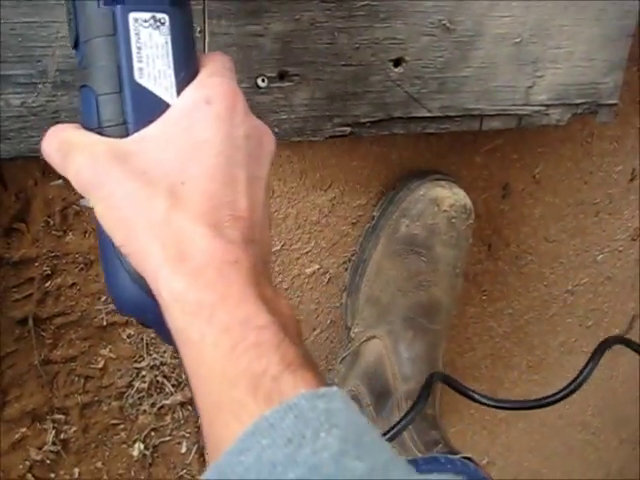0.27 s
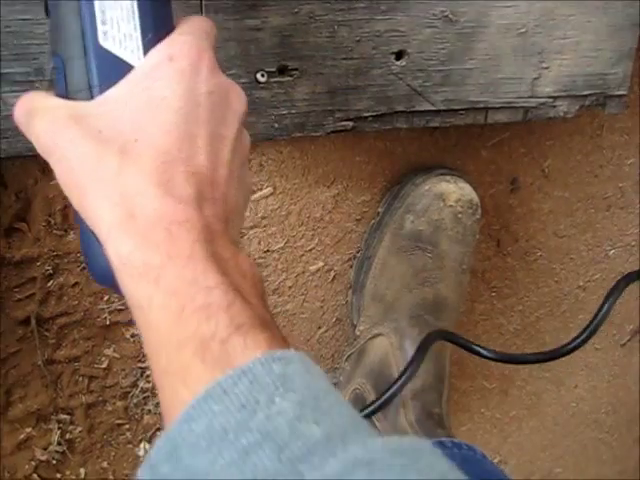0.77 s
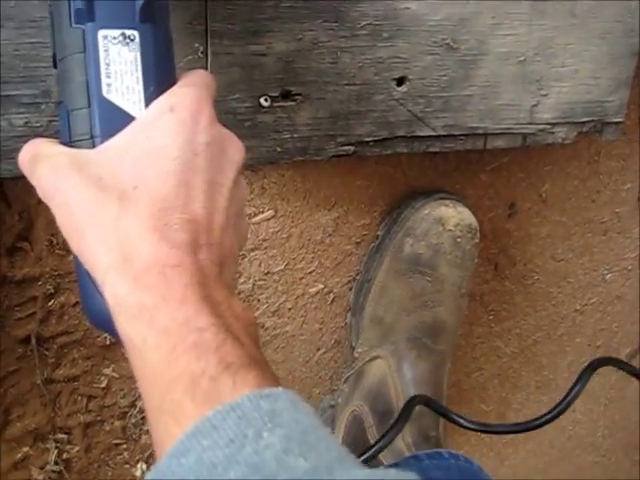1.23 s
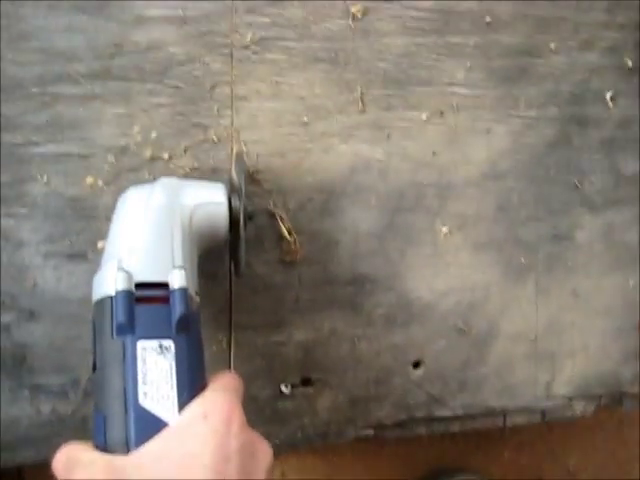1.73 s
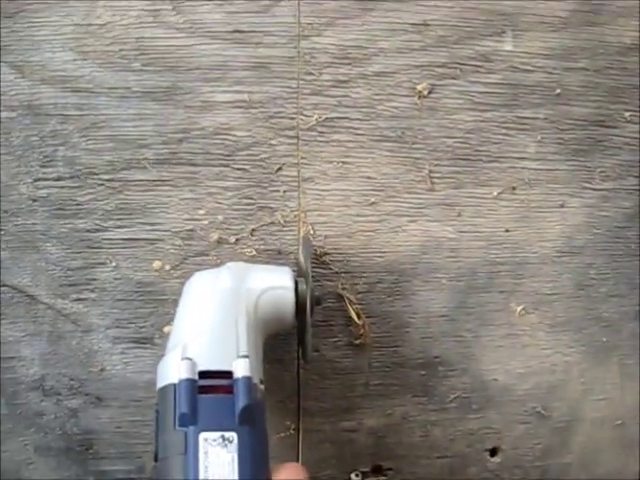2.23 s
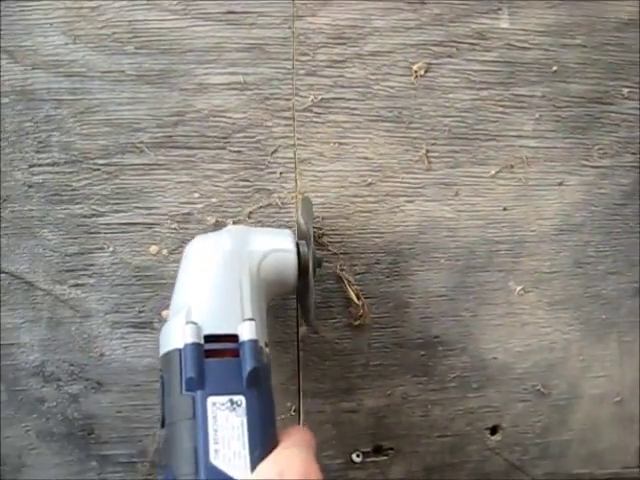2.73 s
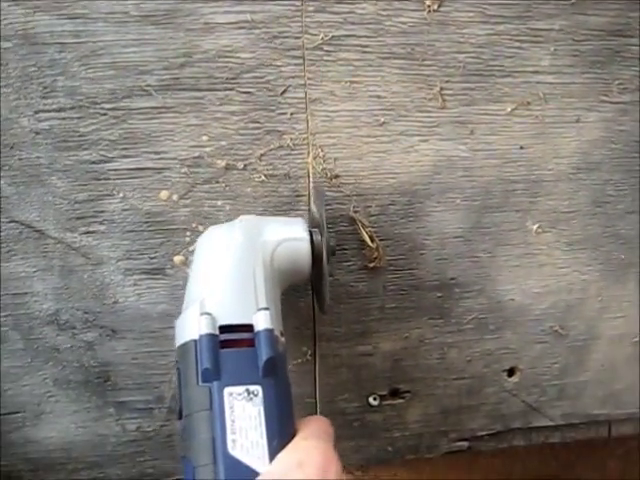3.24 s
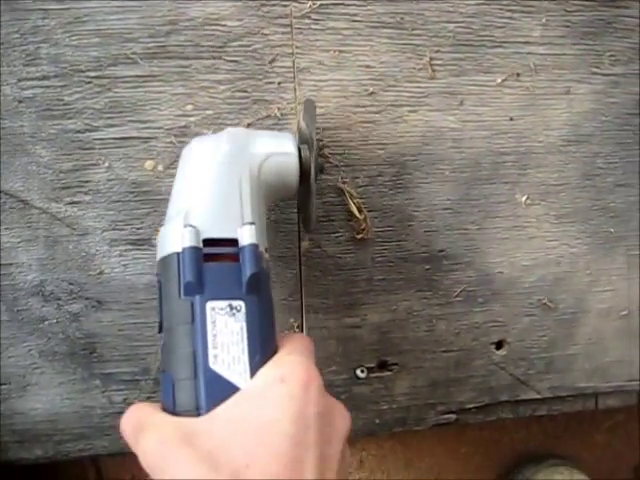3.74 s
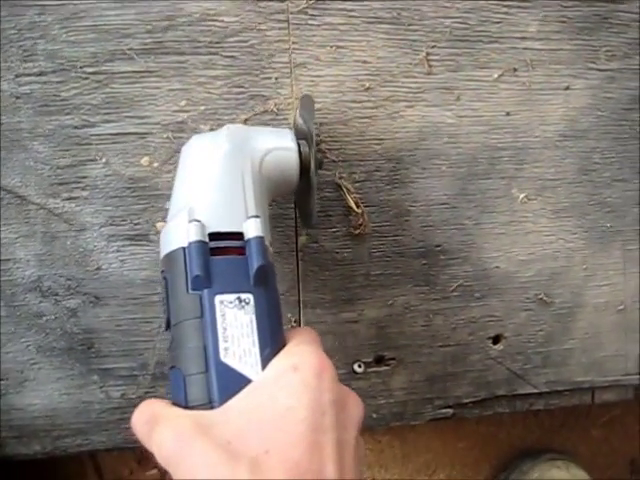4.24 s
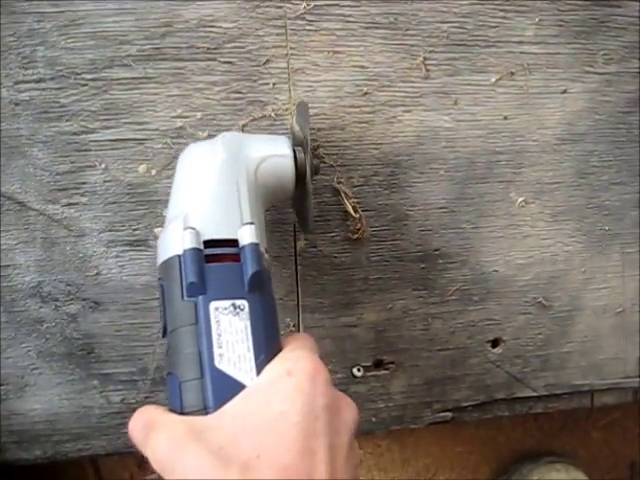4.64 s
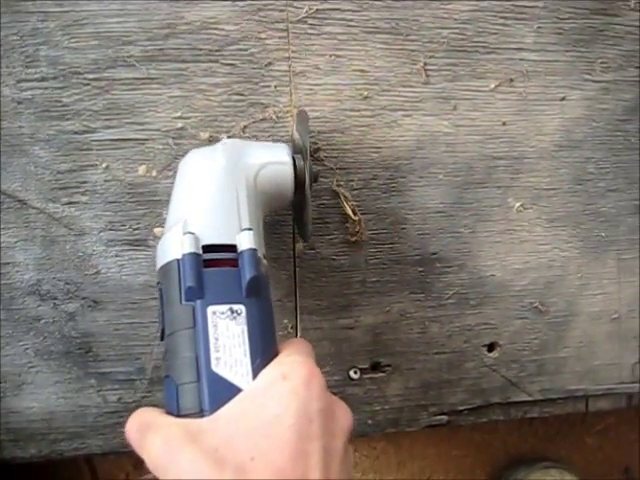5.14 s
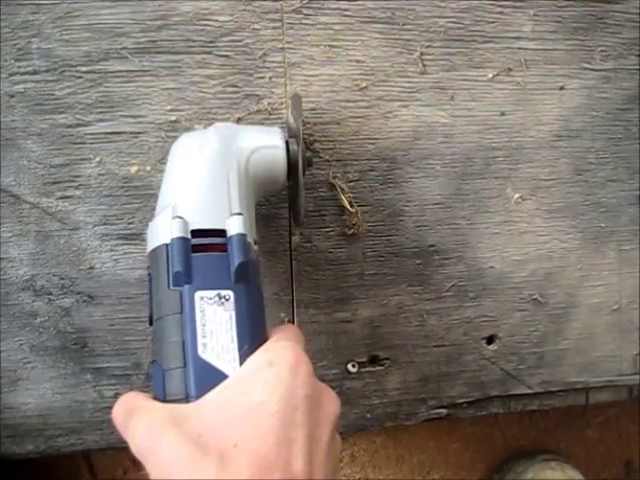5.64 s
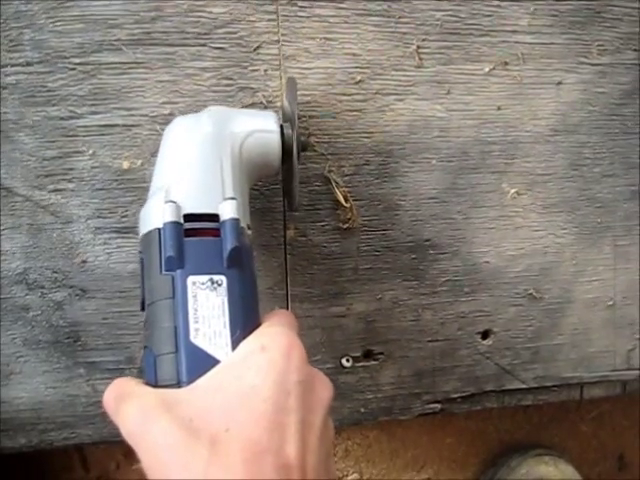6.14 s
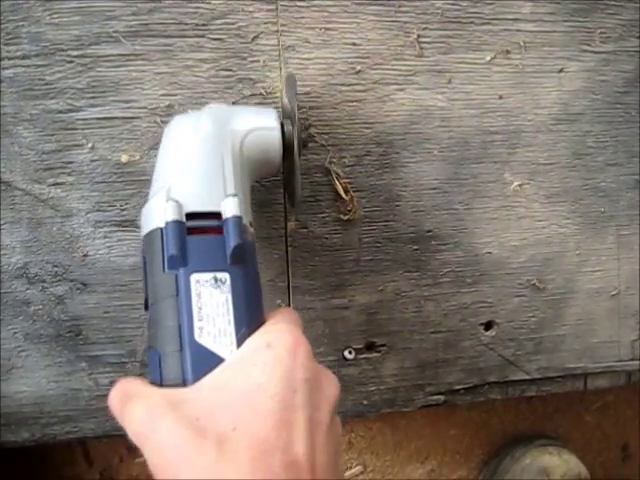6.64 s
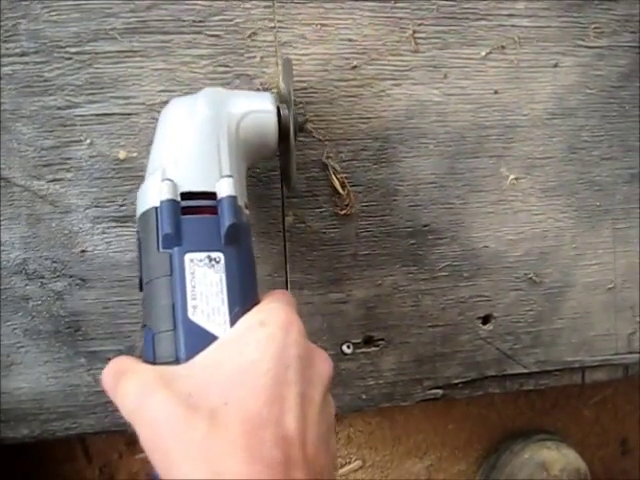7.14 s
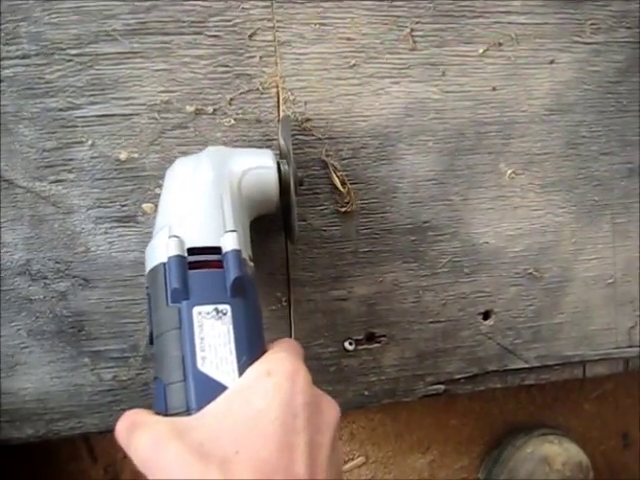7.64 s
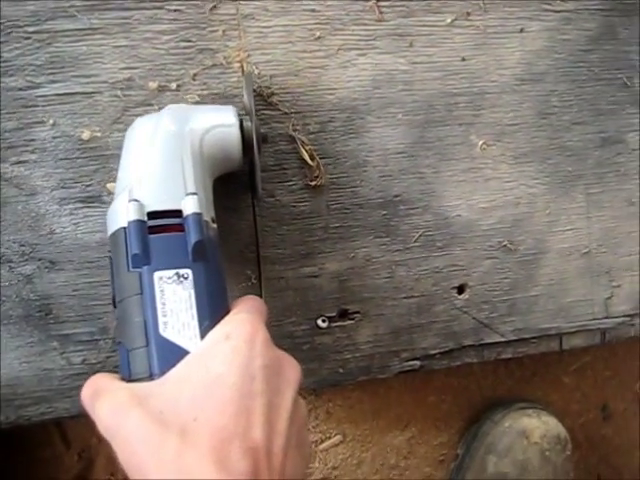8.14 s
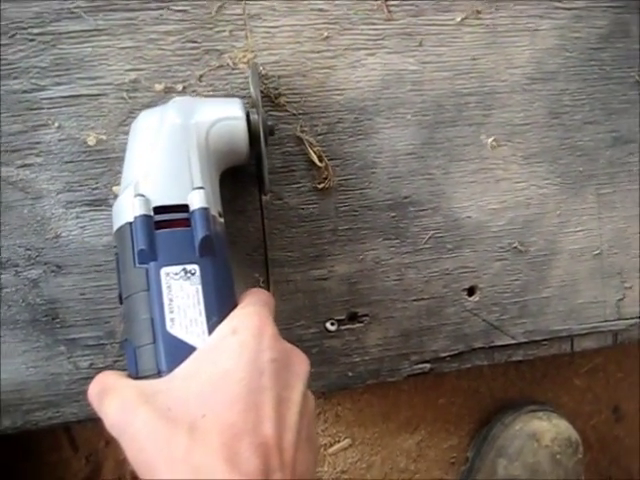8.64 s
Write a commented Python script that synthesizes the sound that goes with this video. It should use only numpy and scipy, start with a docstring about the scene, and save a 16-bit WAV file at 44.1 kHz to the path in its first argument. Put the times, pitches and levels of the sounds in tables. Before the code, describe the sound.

A handheld oscillating multi-tool whines freely, then bites into a weathered board, buzzing harshly, rattling and rasping as its pitch sags lower.

```python
"""An oscillating multi-tool runs free at first: its drive whines and hisses, each tone tied to the stroke rate.
Soon its blade enters a wooden board; the motor sags, the board hums, the blade rattles and the teeth rasp.
Bound stretches bring a harder knock once a stroke, skids bring contacts out of step, and some modes squeal.
About 3 s in, the blade jolts once; long even cuts follow, from 4 s and from 5.3 s, then more skids.
Near the end the motor bogs down to its lowest pitch while the blade hops on the wood."""
import sys
import numpy as np
from scipy import signal
from scipy.fft import rfft, irfft
from scipy.io import wavfile
from scipy.ndimage import uniform_filter1d

SR = 44100
rng = np.random.default_rng(int(sys.argv[2]) if len(sys.argv) > 2 else 0)


def int16_out(signal):
    """Quantize to a 16-bit WAV file."""
    q = np.round(np.clip(np.atleast_2d(signal).T, -1, 1) * 32767)
    wavfile.write(sys.argv[1], SR, q.astype(np.int16))


N = 392490
T = np.arange(N) / SR  # time of each sample, s

# speed of the motor, sagging as the hand pushes: t/s, stroke rate f/Hz
SPEED = [(0.1, 319), (0.64, 316.6), (0.88, 304.7), (1.12, 305.2), (1.22, 295), (1.63, 276.7), (1.73, 277.9),
         (2.12, 268.8), (2.29, 273.7), (2.39, 269.2), (2.66, 249.7), (3.07, 273.8), (3.22, 266.5),
         (3.37, 269.5), (3.49, 264.2), (3.66, 271.3), (3.81, 264.8), (4.29, 260), (4.47, 244),
         (4.81, 263.5), (5.27, 268.4), (5.66, 256.7), (5.86, 257.3), (6.39, 251.9), (6.59, 257.2),
         (6.74, 267.7), (7.0, 262.2), (7.25, 267), (7.42, 261.6), (7.61, 270.5), (7.74, 270.1),
         (8.01, 256.1), (8.18, 253.2), (8.39, 239.7), (8.76, 226.2), (8.86, 224.2)]
# how hard the board shakes: multiple of the stroke rate, level/dB in the wood without sag, slope/dB per Hz of sag
BOARD_HUM = [(1, -35.5, 0.2017), (2, -49.5, 0.2292)]
# how the housing answers multiples 3 to 5 of the stroke rate: f/Hz, level/dB
HOUSING = [(680, -40.5), (770, -41.5), (830, -32), (875, -29.5), (920, -44), (970, -31), (1090, -35.5),
           (1205, -27.5), (1270, -37), (1325, -31.5), (1500, -38.5)]
# how far the housing follows the hand: multiple of the stroke rate, dB per dB of the first push column
HOUSING_PUSH = [(3, 0.66), (4, 0.76), (5, 0.23)]
# the hand presses down or eases off: start t/s, end t/s, gain of the stroke rate/dB, gain of its double/dB
PUSHES = [(1.2, 1.5, 1.5, 7), (1.48, 1.7, -4.5, -7), (1.8, 2.2, -4.5, 3.5), (2.2, 2.9, 1.5, 6),
          (2.98, 3.79, -7.5, -2.5), (4.38, 4.66, -4, 4), (4.87, 5.45, -2.5, 5.5), (5.45, 6.42, -1.5, 3),
          (6.42, 6.76, 3, 6), (6.72, 7.0, -4.5, 1.5), (6.98, 7.3, 0.5, 3), (7.28, 7.95, -7, -10),
          (8.4, 9.2, 1, 4)]
# the housing drones louder or quieter as the grip shifts: start t/s, end t/s, gain/dB
GRIPS = [(1.49, 1.62, 4.5), (2.5, 2.7, 1.5), (3.13, 3.24, 8.5), (3.26, 3.35, -21), (3.35, 3.68, 7),
         (4.95, 5.52, 3), (5.7, 6.15, -3), (7.32, 7.52, 4.5), (7.59, 7.68, 8.5)]
# whine of the unloaded drive: multiple of the stroke rate, level/dB
IDLE_WHINE = [(7, -28), (8, -39.5), (11, -32.5), (13, -29.5), (15, -25), (17, -29.5), (18, -27.5),
              (22, -37), (29, -39), (31, -36)]
# the motor whistle is loudest where it meets a resonance of the housing: f/Hz, level/dB
WHISTLE = [(9100, -49), (9650, -41), (10300, -41), (11000, -39), (11450, -50)]
# tones beside the low multiples, from mains ripple in the motor's torque: f/Hz, level/dB
RIPPLE = [(155, -72), (205, -54), (400, -55.5), (620, -62), (900, -59)]
# colour of the board under the blade: f/Hz, level/dB
WOOD = [(1150, -66), (1380, 1), (1530, 7.5), (1880, -0.5), (2150, 2), (2700, 4), (3300, 0.5), (3750, 0.5),
        (4100, -12), (5500, -53)]
# colour of the steel blade and its clamp: f/Hz, level/dB
STEEL = [(2600, -35.5), (3700, -8), (4050, 10), (4900, 10), (5700, 0), (6150, -3.5), (7400, -14.5),
         (8800, -12), (10000, -5), (12000, -30), (15500, -49)]
# colour of the hard, clean knock of a blade that sits square: f/Hz, level/dB
SQUARE_KNOCK = [(3300, -19.5), (4100, 2), (4900, 2), (5650, -3.5), (6100, -30.5), (6750, -11.5),
                (7500, -28), (8700, -21), (9600, -10.5), (10400, -12.5), (12000, -40)]
# colour of teeth tearing fibres: f/Hz, level/dB
FIBRES = [(100, -41), (400, -14.5), (620, -21.5), (1000, -9), (1600, -6), (2700, -7), (3700, -6.5),
          (4600, 2.5), (5600, -1), (6900, -9), (9800, -11.5), (11800, -20), (13500, -22.5), (15600, -35)]
# how hard the teeth tear the wood: t/s, level/dB before the mix offset in scene()
RASP = [(0, -24.5), (.7, -23), (1.0, -19.5), (2.2, -20), (2.8, -21), (3.15, -20), (3.7, -19.5),
        (4.4, -22.5), (5.05, -20), (5.7, -21.5), (6.35, -24), (6.8, -20.5), (7.6, -21), (8.9, -25)]
# the blade binds and knocks: start t/s, end t/s, gain of the steel and its fizz/dB
BINDS = [(0.745, 0.894, 6.5), (0.925, 1.217, 4), (1.439, 1.498, 5.5), (1.545, 1.597, 6), (1.784, 1.92, 4),
         (2.007, 2.096, 4.5), (2.267, 2.322, 4), (2.389, 2.521, -0.5), (3.059, 3.114, 3),
         (3.135, 3.25, 2.5), (3.344, 3.451, 3.5), (3.539, 3.601, 4.5), (3.715, 3.749, 5),
         (4.001, 4.404, 1.5), (4.4, 4.758, -0.3), (4.842, 4.968, 5), (5.042, 5.08, 7), (5.142, 5.265, 3),
         (5.286, 5.616, 0), (5.618, 6.001, -1.7), (6.776, 6.94, 3), (7.225, 7.46, 4), (7.61, 7.801, 5),
         (7.77, 8.496, 0.7)]
# the blade sits square and cuts evenly: start t/s, end t/s (a row that ends before it starts is silent)
EVEN_CUTS = [(1.79, 1.56), (2.42, 2.54), (4.0, 4.48), (5.27, 6.45), (6.8, 6.97)]
# the blade skids out of step: start t/s, end t/s, share of stray strokes 0-1
SKIDS = [(1.26, 1.42, .4), (2.747, 2.9, .25), (2.95, 3.142, .4), (3.165, 3.292, .5), (3.643, 3.74, .5),
         (6.68, 6.788, .7), (7.012, 7.126, .85), (7.516, 7.621, .7)]
# the blade leans on the side of the slot and the board's buzz changes: start t/s, end t/s, gain/dB
LEANS = [(1.4, 1.5, 3.5), (1.71, 1.8, 2), (1.99, 2.07, 3.5), (2.18, 2.33, 2.5), (2.45, 2.59, 2.5),
         (2.77, 2.86, 2.5), (3.68, 3.8, 3), (4.78, 4.9, -1.5), (7.52, 7.65, 3.5), (7.91, 8.37, 3)]
# the blade loses its grip for a moment and the cut goes quieter: start t/s, end t/s, gain/dB
SLIPS = [(1.91, 1.96, -1.5), (2.66, 2.78, -2.5), (3.26, 3.33, -1), (4.96, 5.01, -4), (6.96, 7.02, -2.5),
         (8.49, 8.71, -0.5)]
# the blade or housing rings at one of its own pitches: start t/s, end t/s, f/Hz, level/dB
SQUEALS = [(.9, 1.46, 2110, -29), (2.97, 3.1, 2170, -28), (3.15, 3.27, 5450, -24), (4.78, 5.19, 2680, -32),
           (4.85, 6.02, 5650, -31), (7.45, 7.66, 2150, -30), (7.93, 8.4, 2950, -29),
           (7.86, 8.92, 6450, -35)]
# the tool hops on the wood: start t/s, end t/s, strokes per hop, slap level/dB, thud level/dB
HOPS = [(0.908, 1.039, 2, -47, -41), (1.097, 1.528, 3, -32, -55), (8.201, 8.946, 2, -35, -66)]
# the top treble drops as the cut begins and lifts slightly near the end: start t/s, end t/s, gain/dB
SHADES = [(0.54, 1.58, -5.5), (7.8, 9.2, 0.5)]

BITE_S = (0.57, 0.82)  # the blade enters the wood
# strokes a second without load; the sag beyond which the board shakes no harder; the usual sag
FREE_HZ, FULL_SAG_HZ, USUAL_SAG_HZ = 319, 64.4, 52.4
HUM_FREE_DB = -21  # change of the board hum while the blade is out of the wood
HOUSING_WAVER_DB = 2.0
RIPPLE_HZ = 100
RATTLE_DB, RATTLE_FREE_DB = -23, -28  # in the wood and out of it
RATTLE_DB_PER_HZ = 0.03  # more sag, more rattle
BUZZ_DB = -26
BIND_FADE_S, LEAN_FADE_S, PUSH_FADE_S = 0.022, 0.011, 0.051
SLIP_FADE_S, SKID_FADE_S, GRIP_FADE_S = 0.0058, 0.011, 0.014
SKID_STEEL_DB, SKID_RASP_DB = 1.8, 0.7
BOUND_SKID_RASP_DB = 3.6  # extra rasp where binding and skidding overlap
EVEN_SHARE, EVEN_STEEL_DB, EVEN_RASP_DB = .8, 2, -2.6
ZING_DB, ZING_HZ, ZING_WIDTH_HZ = -18.5, 9420, 1800  # level is added to the RASP table's level
JOLT_S, JOLT_DB = 3.06, 1
FLARE_DB, FLARE_HZ = 7, (4300, 5850)
SHIFT_DB, SHIFT_HZ, SHIFT_S = 3, 480, .085  # typical depth, then patch size in pitch and time
FLUTTER_DB, FLUTTER_TURNS = 3, .025
SQUEAL_FADE_S, SQUEAL_WAVER_DB = .025, 2.5
SHADE_HZ, EDGE_HZ = 7700, 15700


def amp(db):
    """Turns decibels into gain."""
    return 10 ** (np.asarray(db) / 20)


def curves(rows):
    """Joins each column of a table by straight lines in time."""
    s, *columns = np.transpose(rows)
    return [np.interp(T, s, c) for c in columns]


def spell(start, end, fade_s=0.0044):
    """One between two times, with short fades."""
    return np.clip(np.minimum(T - start, end - T) / fade_s, 0, 1)


def spells(rows, fade_s):
    """One curve per value column: on during each row's time, zero between; overlapping rows add."""
    out = np.zeros((len(rows[0]) - 2, N))
    for start, end, *values in rows:
        on = slice(*np.searchsorted(T, [start, end]))
        fade = np.minimum(np.minimum(T[on] - start, end - T[on]) / fade_s, 1)
        out[:, on] += np.outer(values, fade)
    return out


def sag_of(speed):
    """How far the motor has slowed, in Hz, up to the limit."""
    return np.minimum(FREE_HZ - speed, FULL_SAG_HZ)


def steady(x, size=1400):
    """Scales x to a running rms of one."""
    power = uniform_filter1d(uniform_filter1d(x ** 2, size), size)
    return x / np.sqrt(power + 1e-12)


def blend(a, b, share):
    """Crossfades from a to b at equal power."""
    return np.sqrt(1 - share) * a + np.sqrt(share) * b


def drift(hz):
    """Slow chance of unit size, with changes up to about hz."""
    count = N // 64
    f = np.fft.rfftfreq(count, 64 / SR)
    x = irfft(rfft(rng.standard_normal(count)) * np.exp(-(f / hz) ** 2), count)
    return np.interp(T, np.arange(count) * 64 / SR, x / x.std())


def ring(x, colour, size=4096):
    """Passes x through a body with the given spectrum that answers only after it is struck."""
    hz, db = np.transpose(colour)
    f = abs(np.fft.fftfreq(size, 1 / SR)) + 1
    log_gain = np.log(amp(np.interp(np.log(f), np.log(hz), db)))
    # the phase that belongs to this spectrum puts the energy as early as possible
    response = np.fft.ifft(np.exp(np.conj(signal.hilbert(log_gain)))).real
    return signal.oaconvolve(x, response[:size // 2])[:N]


def fuzzy_tone(hz, width_hz):
    """Noise passed twice through one narrow resonance, rms one."""
    r = np.exp(-np.pi * width_hz / SR)
    poles = [1, -2 * r * np.cos(2 * np.pi * hz / SR), r * r]
    x = signal.lfilter([1, 0, -1], poles, rng.standard_normal(N))
    x = signal.lfilter([1, 0, -1], poles, x)
    return x / x.std()


def shifting(x, size=512):
    """The resonances of blade and board flare and sink in patches as the point of contact moves."""
    hz, s, z = signal.stft(x, SR, nperseg=size)
    field = rng.standard_normal(z.T.shape).T
    for _ in range(2):
        field = uniform_filter1d(field, round(SHIFT_HZ / hz[1]), axis=0)
        field = uniform_filter1d(field, round(SHIFT_S / s[1]), axis=1)
    gain = amp(2 * SHIFT_DB * np.tanh(.5 * field / field.std()))
    return steady(signal.istft(z * gain, SR, nperseg=size)[1][:N])


def contact(turns, place, force, jitter, uneven, size=8):
    """One click a stroke at a place in the cycle; timing (in cycles) and strength vary by stroke."""
    strokes = np.arange(-1, int(turns[-1]) + 1)
    chance = rng.standard_normal((N // 100, 2))[:len(strokes)]
    cycle = strokes + np.interp(strokes, turns, place) + jitter * chance[:, 0]
    at = np.interp(cycle, turns, np.arange(N))
    strength = np.interp(strokes, turns, force) * np.exp(uneven * chance[:, 1])
    strength = strength * (at > 0) * (at < N - 1)
    # a short smooth pulse lets a click fall between two samples
    taps = at.astype(int)[:, None] + np.arange(1 - size, size + 1)
    offset = taps - at[:, None]
    clicks = strength[:, None] * np.sinc(offset) * np.cos(np.pi * offset / (2 * size)) ** 2
    return np.bincount(np.clip(taps, 0, N - 1).ravel(), clicks.ravel(), N)


def chatter(turns, wander, wander_hz, swing_db, swing_hz, jitter, uneven, count=6):
    """Several light contacts in every stroke; each slides through the cycle and comes and goes."""
    out = np.zeros(N)
    for k in range(count):
        place = (k + rng.random()) / count + wander * drift(wander_hz)
        force = amp(swing_db * drift(swing_hz))
        out += (-1) ** k * contact(turns, place, force, jitter, uneven)
    return out


def skitter(turns, count=3):
    """A few contacts a stroke, scattered widely in the cycle."""
    return sum((-1) ** k * contact(turns, np.full(N, k / count), np.ones(N), jitter=.09, uneven=.3)
               for k in range(count))


def rumble(speed, load):
    """A faint low shudder that grows with the push on the board."""
    colour = [(25, -0.5), (90, -2.0), (300, 6.5), (900, -39)]
    low = steady(ring(rng.standard_normal(N), colour), size=8000)
    push_db = spells(PUSHES, PUSH_FADE_S)[0]
    return amp(-57.5 - 10 * (1 - load) + 0.056 * sag_of(speed) + push_db) * low


def growl(turns, speed):
    """Mains ripple puts weak tones above and below the first three multiples of the stroke rate."""
    out = np.zeros(N)
    for k in range(1, 4):
        for hz in (-RIPPLE_HZ, RIPPLE_HZ):
            level_db = np.interp(k * speed + hz, *np.transpose(RIPPLE)) + 2.3 * drift(12)
            out += amp(level_db) * np.cos(2 * np.pi * (k * turns + hz * T + rng.random()))
    return np.sqrt(2) * out


def motor(turns, speed):
    """The commutator whistles 36 times a turn; a bearing hisses at the start and near the end."""
    bars = 36
    whistle_db = np.interp(bars * speed, *np.transpose(WHISTLE)) + 1.2 * drift(25)
    whistle = np.sqrt(2) * amp(whistle_db) * np.sin(2 * np.pi * bars * turns + 0.5 * drift(40))
    hiss_on = spell(-1, 1.12) + 0.7 * spell(7.95, 8.62)
    hiss = amp(-50 + 3 * drift(25)) * hiss_on * fuzzy_tone(13500, 500)
    return whistle + hiss


def free_drive(turns):
    """Gears and bearings of the unloaded tool whine at multiples of the stroke rate, with a thin hiss."""
    whine = np.zeros(N)
    for k, db in IDLE_WHINE:
        phase = 2 * np.pi * (k * turns + rng.random()) + 0.011 * k * drift(83)
        whine += amp(db + 1.5 * drift(19)) * np.cos(phase)
    return np.sqrt(2) * whine + amp(-28.5) * fuzzy_tone(6160, 130)


def hum(turns, speed, load, skid, even):
    """The swinging blade shakes the board at multiples 1 and 2, and the housing at 3 to 5."""
    pushes = spells(PUSHES, PUSH_FADE_S)
    grip_db = spells(GRIPS, GRIP_FADE_S)[0]
    unsteady = 1 - .5 * even
    levels = []
    for (k, db, slope), push_db in zip(BOARD_HUM, pushes):
        load_db = slope * sag_of(speed) + HUM_FREE_DB * (1 - load)
        levels.append((k, db + load_db + push_db + k * 1.16 * unsteady * drift(8.8)))
    for k, share in HOUSING_PUSH:
        db = np.interp(k * speed, *np.transpose(HOUSING)) + share * pushes[0]
        # the grip acts only above 900 Hz
        db = db + (k * speed > 900) * grip_db + load * unsteady * HOUSING_WAVER_DB * drift(12.4)
        levels.append((k, db))
    out = np.zeros(N)
    for k, db in levels:
        flutter = np.sqrt(skid) * (1 < round(k) < 4)  # stray strokes make multiples 2 and 3 flutter
        gain = amp(db + (.5 + FLUTTER_DB * flutter) * drift(26.4))
        cycles = round(k) * turns + rng.random() + FLUTTER_TURNS * flutter * drift(50)
        out += gain * np.cos(2 * np.pi * cycles)
    return np.sqrt(2) * out


def jolt():
    """The blade jumps once in the slot and knocks dully on the board."""
    return amp(JOLT_DB) * ring(1.0 * (np.arange(N) == round(JOLT_S * SR)), WOOD)


def hops(turns):
    """A slap and a thud tied to hops slower than the stroke put tones between its multiples."""
    out = np.zeros(N)
    for start, end, strokes, slap_db, thud_db in HOPS:
        hop = turns / round(strokes)
        blows = contact(hop, 0.279 + 0.0018 * drift(6), np.ones(N), jitter=0.0011, uneven=0.13)
        slaps = ring(blows, WOOD)
        thud = np.sqrt(2) * np.sin(2 * np.pi * (turns - hop) + .5 * drift(11))
        both = amp(slap_db) * slaps / slaps.std() + amp(thud_db) * thud
        out += spell(start, end, fade_s=0.12) * both
    return out


def squeals(turns, width_hz=260):
    """The strokes keep one mode ringing for a while, unsteadily."""
    kicks = contact(turns, np.zeros(N), np.ones(N), jitter=0.002, uneven=0.095)
    out = np.zeros(N)
    for start, end, hz, db in SQUEALS:
        gate = spell(start, end, SQUEAL_FADE_S) * amp(SQUEAL_WAVER_DB * drift(16))
        mode = signal.iirpeak(hz, hz / width_hz, SR)
        on = gate > 0
        ringing = signal.lfilter(*mode, signal.lfilter(*mode, kicks[on]))
        out[on] += amp(db) * gate[on] * steady(ringing)
    return out


def buzz(turns, skid):
    """The sides of the blade slap the slot and the board answers; in a skid the slaps lose their rhythm."""
    slaps = chatter(turns, wander=0.039, wander_hz=2.0, swing_db=5, swing_hz=17.8,
                    jitter=0.0009, uneven=0.028)
    return blend(steady(ring(slaps, WOOD)), steady(ring(skitter(turns), WOOD)), skid)


def rasp(turns, bound):
    """Teeth tear fibres on the way out and back: hiss and tiny snaps, a touch stronger near the knock."""
    sweep = 1 + .35 * np.cos(4 * np.pi * (turns - .27))
    near_knock = 1 + 0.042 * bound * np.exp(-((turns % 1 - .28) / 0.0086) ** 2)
    snap_on = rng.random(N) < 700 / SR  # about 700 snaps a second
    snaps = snap_on * rng.standard_normal(N) * amp(2.0 * np.minimum(rng.exponential(1, N), 4))
    tearing = (rng.standard_normal(N) + 1.77 * snaps) * sweep * near_knock
    return shifting(ring(tearing, FIBRES)) * amp(1.2 * drift(30))


def zing(turns):
    """A bright fizz of the teeth that jumps up at the knock's place in each stroke, then fades."""
    swell = 0.12 + np.exp(-((turns - .246) % 1) / 0.5)
    return steady(fuzzy_tone(ZING_HZ, ZING_WIDTH_HZ) * swell)


def shade(x):
    """Turns the top of the treble down or up for a while."""
    top = signal.sosfiltfilt(signal.butter(3, SHADE_HZ, "high", fs=SR, output="sos"), x)
    return x + (amp(spells(SHADES, .25)[0]) - 1) * top


def flares(count=7):
    """Single modes of the blade flare up briefly, each by chance."""
    return steady(sum(amp(FLARE_DB * drift(11)) * fuzzy_tone(hz, 70)
                      for hz in np.geomspace(*FLARE_HZ, count)))


def rattle(turns, bound, skid, even):
    """Loose chatter and one knock a stroke ring the steel: more knock when bound, stray blows in skids."""
    loose = chatter(turns, wander=0.014, wander_hz=2.13, swing_db=6.0, swing_hz=22.3,
                    jitter=0.0003, uneven=0.06)
    loose = steady(ring(signal.lfilter([1], [1, -.15], loose), STEEL))  # slightly duller
    blows = contact(turns, 0.246 + 0.004 * drift(1.86), np.ones(N), jitter=0.0004, uneven=0.04)
    knock = steady(ring(signal.lfilter([1, -.35], [1], blows), STEEL))  # slightly brighter
    regular = shifting(blend(loose, knock, .25 + .55 * bound))
    square = steady(ring(blows, SQUARE_KNOCK))
    regular = steady(blend(regular, square, EVEN_SHARE * even), size=700)
    stray = blend(steady(ring(skitter(turns), STEEL)), flares(), .4)
    return blend(regular, shifting(stray), skid)


def scene():
    """One stroke cycle drives the layers; the sag of the motor tells how hard the blade is pushed."""
    speed, = curves(SPEED)
    rasp_db, = curves(RASP)
    turns = np.cumsum(speed * (1 + 0.000817 * drift(18.8))) / SR
    load = np.interp(T, BITE_S, [0, 1])
    bound, bind_db = spells([(a, b, 1, db) for a, b, db in BINDS], BIND_FADE_S)
    even, = spells([(a, b, 1) for a, b in EVEN_CUTS], BIND_FADE_S).clip(0, 1)
    skidding, = spells(SKIDS, SKID_FADE_S).clip(0, 1)
    bound = np.maximum(bound.clip(0, 1), even)
    # the harder the teeth tear, the more strokes go astray
    usual_stray = np.interp(rasp_db, [-24.5, -21], [0, .12]) * (1 - .9 * bound)
    skid = np.maximum(skidding, usual_stray)

    free = np.sqrt(1 - load) * free_drive(turns)
    jolt_dip = 1 - .8 * spell(JOLT_S - .01, JOLT_S + .014)  # the hum dips briefly
    board = hum(turns, speed, load, skid, even) * jolt_dip
    board = board + load * growl(turns, speed) + rumble(speed, load) + jolt()

    buzz_db = BUZZ_DB + spells(LEANS, LEAN_FADE_S)[0] - bound + drift(5.6)
    wood = np.sqrt(load) * amp(buzz_db) * buzz(turns, skid ** 1.5)
    rattle_db = RATTLE_DB + RATTLE_DB_PER_HZ * (sag_of(speed) - USUAL_SAG_HZ) + bind_db
    rattle_db = rattle_db + EVEN_STEEL_DB * even + SKID_STEEL_DB * skidding
    rattle_db = rattle_db + (1 - 0.5 * bound) * drift(16)  # a bound blade wavers less
    steel_gain = load * amp(rattle_db) + (1 - load) * amp(RATTLE_FREE_DB)
    steel = steel_gain * rattle(turns, bound, skid, even)
    fizz = load * amp(ZING_DB + rasp_db + bind_db) * zing(turns)

    teeth_db = rasp_db - 3.5 + BOUND_SKID_RASP_DB * bound * skidding
    teeth_db = teeth_db + EVEN_RASP_DB * even + SKID_RASP_DB * skidding + drift(5.8)
    teeth = amp(teeth_db) * rasp(turns, bound)
    # out of the wood, the same noise without its lows serves as the thinner rush of the fan
    fan = amp(3.0) * signal.sosfilt(signal.butter(2, 800, "high", fs=SR, output="sos"), teeth)
    air = load * teeth + (1 - load) * fan

    cutting = amp(spells(SLIPS, SLIP_FADE_S)[0]) * (wood + shade(steel + fizz + air))
    return (free + board + cutting + squeals(turns) + hops(turns) + motor(turns, speed))[None]


def record(dry):
    """Gain control holds loud parts down, a soft knee rounds the peaks; then the band limit."""
    power_db = 10 * np.log10(uniform_filter1d(dry[0] ** 2, size=1000) + 1e-12)
    over_db = uniform_filter1d(np.maximum(power_db + 6.5, 0), size=600)
    held = dry * amp(-.5 * over_db)
    rounded = held / (1 + (held / .78) ** 6) ** (1 / 6)
    low_pass = signal.firwin(511, EDGE_HZ, window=("kaiser", 9), fs=SR)
    return signal.oaconvolve(rounded, low_pass[None], "same")


dry = scene()
out = record(dry)
int16_out(out)
```